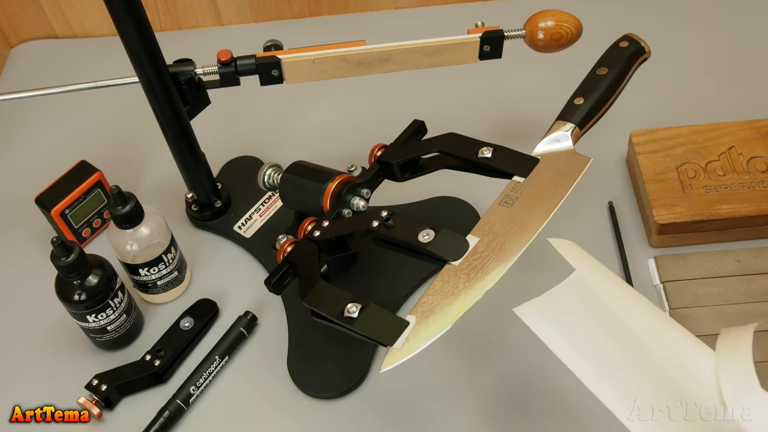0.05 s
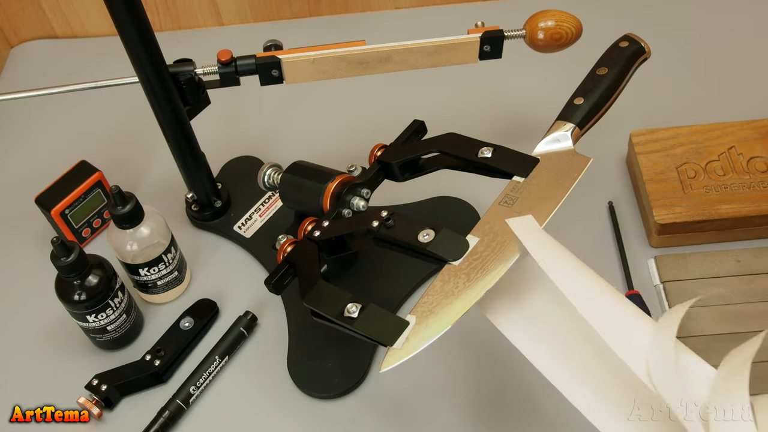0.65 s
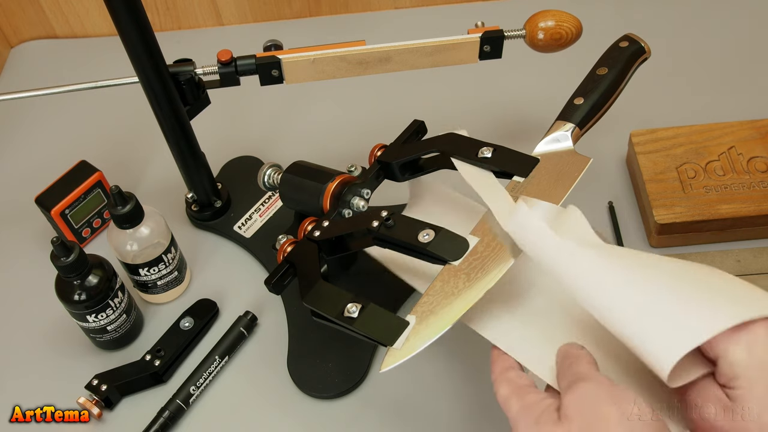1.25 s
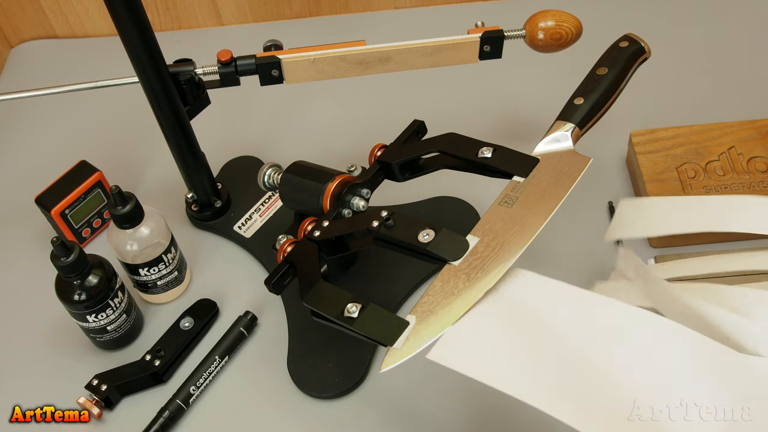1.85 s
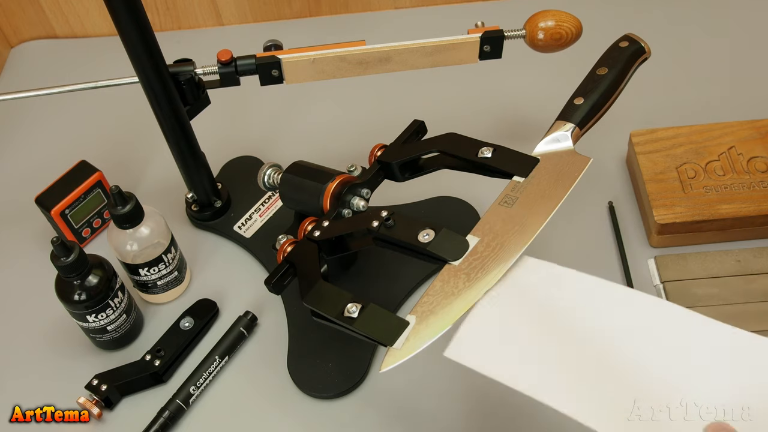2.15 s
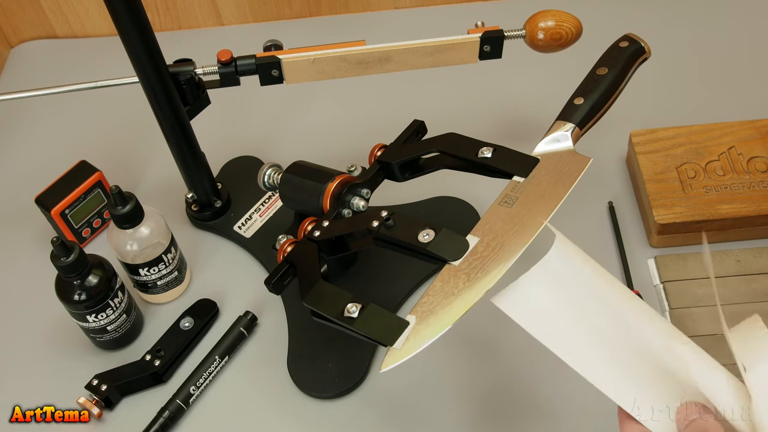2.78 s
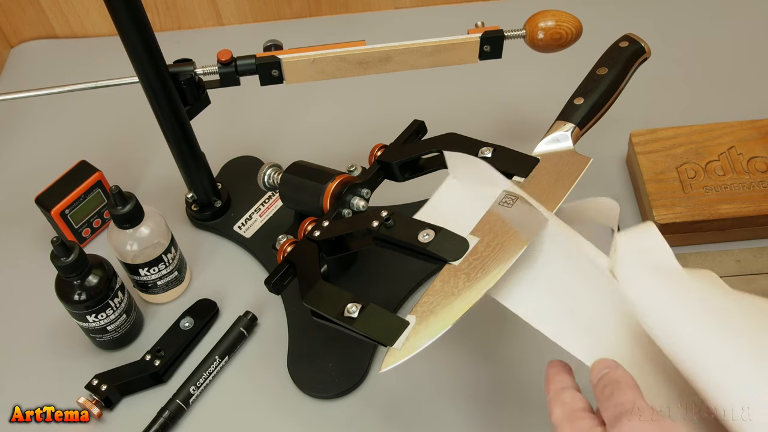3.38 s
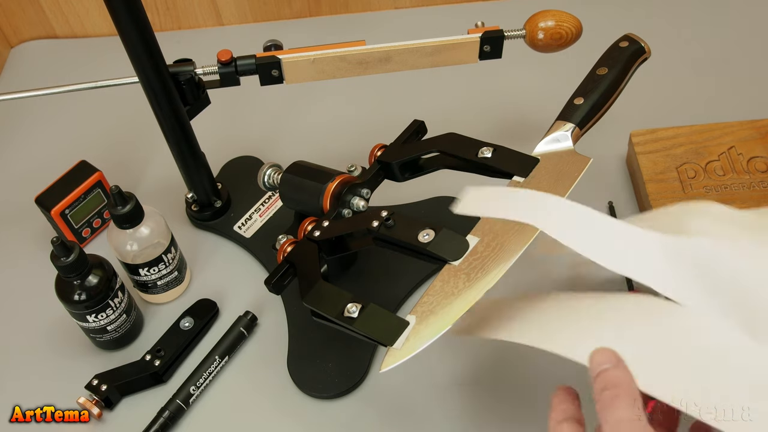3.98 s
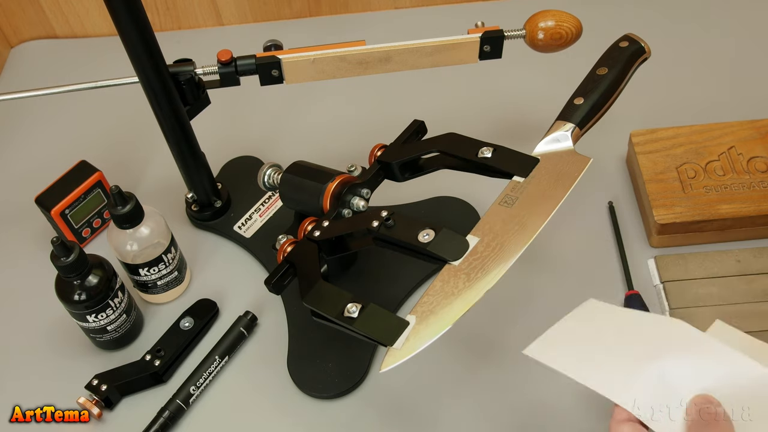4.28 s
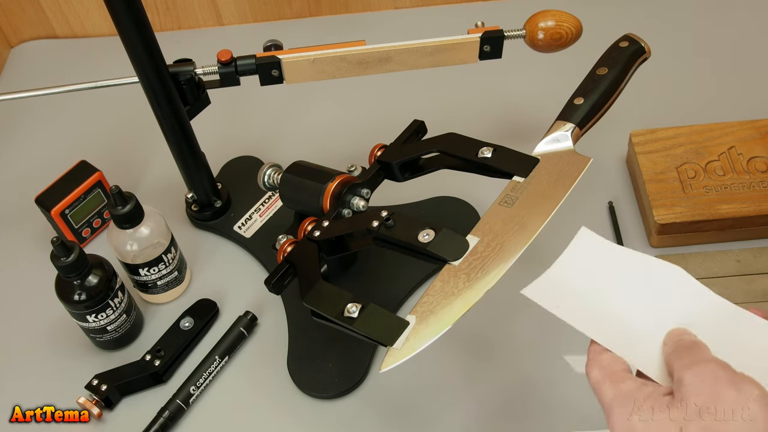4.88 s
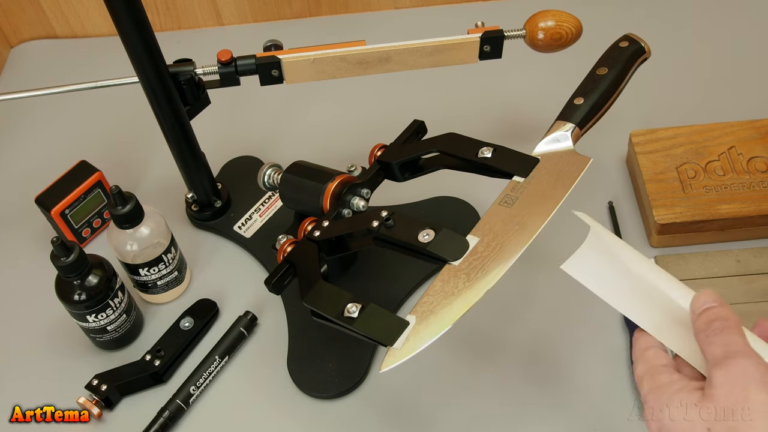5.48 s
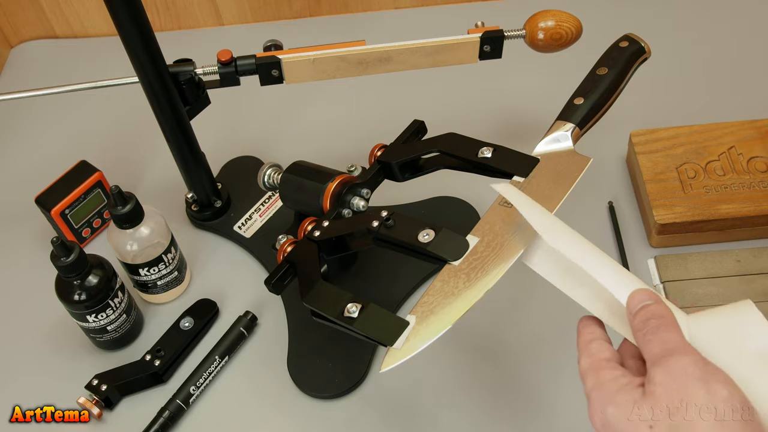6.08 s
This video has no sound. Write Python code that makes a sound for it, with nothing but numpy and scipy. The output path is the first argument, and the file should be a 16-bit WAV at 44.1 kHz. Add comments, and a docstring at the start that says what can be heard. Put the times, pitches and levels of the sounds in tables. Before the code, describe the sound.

A sharp knife slices through a paper sheet twice with a hissing rasp, and the paper rustles and crinkles between cuts.

```python
"""Paper drawn through a knife

A sheet is drawn through a sharp, clamped knife in a small workroom: two long slices, then a third begins.
The edge snaps thousands of fibres a second and the sheet radiates them as a hissing rasp, while the
loosening strip sings and flutters. Between slices the sheet is pulled back and regripped: it rustles,
ticks, buckles and flaps. Still air and a faint mains hum lie underneath."""
import sys
import numpy as np
from scipy import signal
from scipy.fft import rfft, irfft, next_fast_len
from scipy.io import wavfile
from scipy.ndimage import uniform_filter1d, map_coordinates

SR = 44100
rng = np.random.default_rng(int(sys.argv[2]) if len(sys.argv) > 2 else 0)


def inscribe(sig):
    """Save sig as 16-bit PCM at rate SR to the path in sys.argv[1].

    A 1-D sig is mono; a 2-D sig holds one channel per row.
    Samples are clipped to [-1, 1] before scaling.
    """
    pcm = np.round(np.clip(np.atleast_2d(sig).T, -1, 1) * 32767)
    wavfile.write(sys.argv[1], SR, pcm.astype(np.int16))


N = 270774
TIME = np.arange(N) / SR
FFT_SIZE = next_fast_len(N + SR // 2, True)
FREQS = np.maximum(np.arange(FFT_SIZE // 2 + 1) * SR / FFT_SIZE, 1)

# how hard the sheet is drawn through the edge, one curve per slice: (time [s], level [dB])
EFFORT = [
    [(0.65, -51), (0.68, -36), (0.836, -27.5), (1.298, -26), (1.306, -27.5), (1.418, -26), (1.43, -20.5),
     (1.6, -34), (1.612, -30.5), (1.64, -50)],
    [(3.17, -50), (3.18, -40), (3.202, -32), (3.334, -25), (3.7, -31), (3.762, -27), (3.886, -32),
     (3.93, -51)],
    [(6.06, -46.5), (6.086, -33.5), (6.135, -31)],
]
# each slice at the usual effort: (fibre hiss [dB], loose flutter [dB], time to come loose [s])
SLICES = [(-36.5, -50, 0.035), (-35, -47, .32), (-29.5, -52, 0.11)]
# resonances of strip and sheet, per slice: (pitch [Hz], level re effort [dB], delay into the slice [s])
STRIP_MODES = [
    [(2045, -8, 0.048), (4930, -11.5, 0), (4220, -14, 0.14), (3200, -8, 0.19), (2400, -10.5, 0.28)],
    [(3650, -5.5, 0.0014), (5120, -11.5, 0.0044), (2900, -6.5, .04), (2630, -6, 0.089), (4140, -9, .05),
     (3080, -7, 0.12)],
    [(2960, -1.5, 0), (283, -17.5, 0)],
]
# paper slides in the fingers: (start [s], end [s], rustle [dB], hiss [dB], sway [dB])
SLIDES = [(-0.03, .28, -64, -69.5, -70.5), (1.632, 1.828, -42.5, -46, -53.5),
          (1.835, 2.12, -54.5, -59, -55.5), (2.21, 2.335, -58.5, -70, -59.5), (2.329, 2.449, -46, -56, -53),
          (2.51, 2.717, -61.5, -65, -68), (2.964, 3.093, -61, -64.5, -81), (3.894, 4.057, -54, -54, -63),
          (4.142, 4.278, -56, -62.5, -58), (4.312, 4.46, -56, -86, -55), (4.467, 4.704, -58, -59.5, -62),
          (4.702, 5.357, -64.5, -65.5, -69.5), (5.39, 5.705, -65, -68, -76),
          (5.817, 5.846, -62, -64.5, -80), (5.944, 6.07, -56.5, -62, -64)]
# the broad sheet flaps: (time [s], level [dB], centre [Hz], t60 [s])
FLAPS = [(1.415, -39.5, 460, 0.19), (1.938, -48, 383, 0.059), (2.321, -51, 220, .12),
         (2.398, -43.5, 383, 0.23), (3.72, -46, 295, 0.48), (3.8, -46.5, 328, 0.37),
         (4.615, -53.5, 587, 0.087)]

# one-shots: (time [s], body level [dB], centre [Hz], treble re body [dB], t60 [s])
CATCHES = [(1.428, -30, 1780, -8, 0.11), (1.451, -29, 1560, 3.5, 0.057), (1.475, -30.5, 1900, 4, 0.035),
           (1.607, -35, 1680, -34, 0.08)]  # the edge catches and rips through a clump of fibres
TICKS = [(0.116, -50, 1950, -14, 0.075), (0.241, -50.5, 2080, -23, 0.11), (1.673, -30, 3200, -4.5, 0.048),
         (1.753, -27.5, 2910, -25, 0.031), (1.782, -37, 3820, -3, 0.047), (1.82, -48, 3450, -6, .06),
         (1.946, -41, 3300, -11, 0.033), (2.086, -34, 3060, -2, 0.027), (2.177, -44, 3450, -17, 0.073),
         (2.842, -56.5, 5100, -14, 0.071), (2.89, -55.5, 2880, -9.5, 0.11), (3.954, -42.5, 2230, -4, 0.049),
         (4.144, -53.5, 1500, -3.5, 0.29), (4.508, -44.5, 3150, -7, 0.03), (4.929, -48, 3970, 0.5, .06),
         (5.454, -57, 2030, -11, .08), (5.075, -52, 3600, -13, 0.11)]  # creases tick and the cut strip flicks
SWISHES = [(1.89, -41, 3140, -3.5, 0.13), (2.024, -42, 1920, -6.5, 0.092), (2.052, -39.5, 3300, -5.5, 0.17),
           (2.113, -50, 3240, 3, 0.2), (2.33, -50, 2900, -9, 0.087), (2.364, -40, 3200, -9, 0.08),
           (2.438, -43, 1910, -3.5, 0.062), (4.215, -43.5, 2440, -24, 0.12), (5.175, -61, 3460, 8.5, 0.22),
           (5.205, -49, 3190, -3.5, 0.18), (5.545, -46, 2520, -6, .1), (5.565, -49.5, 2570, -9, 0.16)]  # the sheet swings
BUCKLES = [(2.244, -40, 3020, -33, 0.052), (2.356, -32, 3050, -1.5, 0.051), (2.405, -28, 3070, -11, 0.058),
           (2.411, -27, 2400, -16, 0.082), (4.168, -29.5, 1600, -16, 0.074),
           (4.29, -49.5, 1570, -30, 0.063), (4.346, -45, 3020, -8, 0.071), (4.37, -47, 2900, -17, 0.19),
           (4.407, -40.5, 1690, -43, 0.12), (4.444, -40, 2270, -36, 0.08), (4.622, -59, 2920, -18, 0.11),
           (5.008, -50, 1560, -13, 0.024), (5.293, -39.5, 3300, -34, 0.044)]  # the whole sheet buckles over
TAPS = [(5.975, -24.5, 3920, -7.5, 0.038)]  # the sheet's rim is set on the blade

# tone colours: (frequency [Hz], relative level [dB])
CUT_COLOUR = [(500, -32.5), (900, -33.5), (1150, -27), (1400, -11), (1650, -6.5), (2100, -0.5), (3100, 2.5),
              (4200, -2.5), (5500, -4.5), (7500, -9.5), (10000, -12), (14500, -17), (16000, -24)]
FLUTTER_COLOUR = [(25, -10), (60, -7), (130, -5.5), (250, -4.5), (400, -2.5), (540, 0.5), (650, -2),
                  (790, 2), (950, -5), (1200, -6.5), (1800, -66)]
RUSTLE_COLOUR = [(500, -46), (900, -7.5), (1120, -14), (1450, -3), (2040, 4.5), (2400, 3), (3400, 4.5),
                 (4500, 0.5), (6400, -9), (8000, -15.5), (12000, -20), (16000, -18)]
SWAY_COLOUR = [(40, -13.5), (130, -4), (250, 0), (400, 5), (540, 1.5), (650, -2), (790, 2), (950, -6),
               (1200, -27.5), (1800, -26.5)]
TICK_COLOUR = [(100, -9), (400, -36), (800, -5.5), (1100, -22), (1900, -0.5), (3500, 0), (7000, -6),
               (11000, -20.5), (16000, -24)]
BUCKLE_COLOUR = [(60, -8), (200, -25), (390, 0.5), (520, -2.5), (640, -3), (830, 1), (1100, -11), (1600, 3),
                 (3000, 3.5), (6600, -5.5), (8500, -25.5), (16000, -37)]
ROOM_COLOUR = [(15, -45), (25, -11.5), (117, 2.5), (212, 3), (451, -5), (591, -8), (800, -15), (1150, -24),
               (2000, -12), (2690, -12), (3430, -11.5), (4740, -18), (14000, -29.5), (16000, -49)]

# how alike the two microphone ports sound: (frequency [Hz], left-right correlation [-1 to 1])
LIKENESS = [(30, 0.2), (120, 0.6), (400, .8), (1500, 0.72), (3200, 0.79), (4500, 0.16), (6200, 0),
            (9000, -0.41), (12000, 0), (16000, 1)]
# their lean to the left: (frequency [Hz], left minus right [dB])
BALANCE = [(60, 3.1), (130, 2.3), (290, 1.9), (640, 2.3), (1410, 3.1), (3100, 0.85), (6820, 3.4),
           (15000, 1.4)]

USUAL_EFFORT_DB, RASP_DB = -28, -2  # the rasp is relative to the effort
HISS_FOLLOWS, FLUTTER_FOLLOWS = 0.92, 0.51  # shares of the effort's swing in dB
TAUT_FLUTTER_DB = -15  # a taut strip flutters less
HISS_EDGE_HZ = 5500  # crossover from ringing body to fibre hiss


def slicing():
    """The edge snaps fibres densely; the sheet rings, and flutters more as the strip comes loose."""
    fibres = grains(per_s=6000, spread_db=2, clump_db=1, clump_rate=45)
    voice = sheet(fibres, ring_t60=.05, ring_db=-8, wander_db=9, places=8)
    rasp, hiss = rasp_and_hiss(bending(voice, depth_db=2.5, hold_frames=14), CUT_COLOUR)
    jerks = flutter(grains(per_s=830, spread_db=1, clump_db=1.5, clump_rate=120), FLUTTER_COLOUR)
    ringing = from_db(RASP_DB) * rasp + singing_strip()
    out = np.zeros((2, N))
    for curve, (hiss_db, flutter_db, loosen_s) in zip(EFFORT, SLICES):
        times, levels_db = np.transpose(curve)
        start, end = times[0], times[-1]
        span = slice(*np.searchsorted(TIME, [start - .02, end + .02]))
        t = TIME[span]
        gate = uniform_filter1d(1. * ((t >= start) & (t <= end + .008)), size=300)
        effort_db = np.interp(t, times, levels_db)
        swing_db = effort_db - USUAL_EFFORT_DB
        taut = np.clip(1 - (t - start) / loosen_s, 0, 1)
        cut = from_db(effort_db) * ringing[:, span]
        cut += from_db(hiss_db + HISS_FOLLOWS * swing_db) * hiss[:, span]
        cut += from_db(flutter_db + FLUTTER_FOLLOWS * swing_db + TAUT_FLUTTER_DB * taut) * jerks[:, span]
        out[:, span] += gate * cut
    return out


def singing_strip():
    """The taut strip rings at one pitch after another, then glides down as it lengthens."""
    out = np.zeros((2, N))
    for curve, modes in zip(EFFORT, STRIP_MODES):
        for hz, db, delay_s in modes:
            add_note(out, curve[0][0] + delay_s, hz, hz, db, length_s=.35)
    for curve in EFFORT[:2]:  # one broad glide near the middle of each full slice
        start, end = curve[0][0], curve[-1][0]
        glide_start = start + .45 * (end - start)
        add_note(out, glide_start, from_hz=4694, to_hz=3150, db=-7, length_s=.33, width_hz=550)
    for hz, db in (2610, -1), (3130, -1.4):  # the edge squeaks once, on two tones
        add_note(out, 1.295, hz, hz, db, length_s=.063)
    return out


def add_note(out, start, from_hz, to_hz, db, length_s, width_hz=107):
    """Random fibre snaps keep a narrow resonance ringing while it swells and fades."""
    white = rng.standard_normal((2, 2, SR // 2))
    ringing = signal.sosfilt(signal.butter(2, width_hz / 2, fs=SR, output="sos"), white[0] + 1j * white[1])
    first = round(start * SR)
    progress = np.clip((TIME[first:first + ringing.shape[1]] - start) / length_s, 0, 1)
    phase = 2 * np.pi * np.cumsum(from_hz + (to_hz - from_hz) * progress) / SR
    note = rms_one((ringing[:, :len(phase)] * np.exp(1j * phase)).real)
    swell = np.sqrt(np.abs(np.sin(np.pi * progress)))
    out[:, first:first + len(phase)] += from_db(db) * note * swell


def grains(per_s, spread_db, clump_db, clump_rate):
    """Tiny snaps of uneven size that come in clumps."""
    sizes = from_db(spread_db * np.minimum(rng.exponential(1, N), 4)) * rng.choice([-1, 1], N)
    fires = rng.random(N) < per_s / SR
    return sizes * fires * from_db(clump_db * drift(clump_rate))


def sheet(snaps, ring_t60, ring_db, wander_db, places=6, crack_t60=.006):
    """Each place on the sheet has its own crack and ring; the active place wanders. Gives mid and side."""
    t = TIME[:SR // 12]
    odds = from_db(wander_db * np.array([drift(2.5) for _ in range(places)]))
    thresholds = np.cumsum(odds / odds.sum(0), axis=0)
    place = (rng.random(N) > thresholds).sum(0)
    decay = from_db(-60 * t / crack_t60) + from_db(ring_db - 60 * t / ring_t60)
    answers = rng.standard_normal((places, 2, len(t))) * decay
    out = sum(signal.oaconvolve((snaps * (place == k))[None], answers[k], axes=1)[:, :N]
              for k in range(places))
    return out / np.std(out, axis=1, keepdims=True)


def bending(x, depth_db, hold_frames):
    """As the sheet bends, narrow resonances come and go at random and slide in pitch."""
    framing = dict(nperseg=1024, noverlap=768)
    spectra = signal.stft(x.astype(np.float32), **framing)[2]
    bins, frames = np.indices(spectra.shape[1:])
    peaks = uniform_filter1d(rng.standard_normal(bins.shape), size=hold_frames, axis=1)
    peaks = uniform_filter1d(peaks, size=4, axis=0)  # four bins wide
    slide = 1 + .04 * np.sin(2 * np.pi * frames / 200)
    sliding_peaks = map_coordinates(peaks, [bins * slide, frames], order=1, mode="nearest")
    gain = from_db(depth_db * rms_one(sliding_peaks))
    return rms_one(signal.istft(spectra * gain, **framing)[1][:, :N])


def rasp_and_hiss(x, colour):
    """Split the paper's voice into its ringing middle and its fibre hiss."""
    spectrum = rfft(x, FFT_SIZE) * causal(at_hz(colour, FREQS), FFT_SIZE)
    steep = (FREQS / HISS_EDGE_HZ) ** 8
    return [rms_one(irfft(spectrum * share / (1 + steep), FFT_SIZE)[:, :N]) for share in (1, steep)]


def flutter(snaps, colour):
    """The broad sheet pumps air at every jerk."""
    return coloured(np.array([snaps, snaps * rng.choice([-1, 1], N)]), colour)


def rustling(attack_s=.047, release_t60=.25):
    """Fingers and strips slide over the sheet: fine crackle that swells, holds and dies with each move."""
    power = np.zeros((3, N))
    for start, end, *levels_db in SLIDES:
        span = slice(*np.searchsorted(TIME, [start, end + release_t60]))
        t = TIME[span]
        attack = np.minimum((t - start) / attack_s, 1)
        release = from_db(-60 * np.maximum(t - end, 0) / release_t60)
        power[:, span] += np.outer(from_db(levels_db), attack * release) ** 2
    crackle = grains(per_s=3000, spread_db=1, clump_db=2, clump_rate=81)
    voice = sheet(crackle, ring_t60=.023, ring_db=-6.5, wander_db=7)
    rustle, hiss = rasp_and_hiss(bending(voice, depth_db=3.5, hold_frames=7), RUSTLE_COLOUR)
    sway = flutter(grains(per_s=1200, spread_db=4, clump_db=2, clump_rate=2.6), SWAY_COLOUR)
    return sum(gain * layer for gain, layer in zip(np.sqrt(power), (rustle, hiss, sway)))


def pops(rows, colour, rise_share, focus_db, grit_db, patch_octaves=.35, size=12288):
    """Paper gives way in a dying avalanche, boosted round the pitch of the patch that moves."""
    out, t = np.zeros((2, N + size)), TIME[:size]
    hz = np.maximum(np.arange(size // 2 + 1) * SR / size, 1)
    steep = (hz / HISS_EDGE_HZ) ** 8
    for start_s, db, centre_hz, treble_db, t60_s in rows:
        focus = np.exp(-(np.log2(hz / centre_hz) / patch_octaves) ** 2)
        patch = from_db(at_hz(colour, hz) + focus_db * focus)
        body = rms_one(patch / (1 + steep))
        hiss = from_db(treble_db) * rms_one(patch * steep / (1 + steep))
        tone = causal(20 * np.log10(body + hiss), size)
        envelope = rise_and_fall(t, rise_share * t60_s, t60_s)  # longer pops start more softly
        # grit: the avalanche runs in slips of about a millisecond
        slips = rms_one(from_db(grit_db * np.repeat(rng.uniform(-1, 1, size // 48), 48)))
        burst = rfft(rng.standard_normal((2, size)) * slips * envelope)
        first = round(start_s * SR)
        out[:, first:first + size] += from_db(db) * irfft(burst * tone, size)
    return out[:, :N]


def flapping(rise_s=.023, top_hz=1020, band_ratio=1.3):
    """The broad sheet pushes a hollow puff of air each time it flaps."""
    out, t = np.zeros((2, N + SR // 2)), TIME[:SR // 2]
    lowpass = signal.butter(2, top_hz, fs=SR, output="sos")
    for start_s, db, hz, t60_s in FLAPS:
        air = rng.standard_normal((2, len(t)))
        band = signal.butter(1, [hz / band_ratio, hz * band_ratio], "band", fs=SR, output="sos")
        puff = rms_one(signal.sosfilt(lowpass, signal.sosfilt(band, air)))
        first = round(start_s * SR)
        out[:, first:first + len(t)] += from_db(db) * rise_and_fall(t, rise_s, t60_s) * puff
    return out[:, :N]


def room(x, t60_s=.16, wet_db=-10, predelay_s=.004):
    """The bench and the walls add a short diffuse tail."""
    t = TIME[:SR // 2]
    tail = rng.standard_normal((2, len(t))) * from_db(-60 * t / t60_s) * (t > predelay_s)
    tail /= np.sqrt(np.sum(tail ** 2, axis=1, keepdims=True))
    return x + from_db(wet_db) * signal.fftconvolve(x, tail, axes=1)[:, :N]


def room_tone(air_db=-64, hum_db=-73.5, hum_hz=120):
    """Still air, with a faint, wavering mains hum in the mid channel."""
    air = from_db(air_db) * coloured(rng.standard_normal((2, N)), ROOM_COLOUR)
    air[0] += from_db(hum_db + 2 * drift(3)) * np.sqrt(2) * np.sin(2 * np.pi * hum_hz * TIME)
    return air


def microphone_ports(x, left_lag_s=.00002):
    """Mid and side become left and right: narrow in the midrange, wide in most of the treble."""
    mid, side = rfft(x, FFT_SIZE)
    alike = np.clip(at_hz(LIKENESS, FREQS), -.8, .98)
    sign = np.array([[1], [-1]])
    pair = mid + sign * side * np.sqrt((1 - alike) / (1 + alike))
    pair[0] *= np.exp(-2j * np.pi * FREQS * left_lag_s)
    return irfft(pair * from_db(sign * at_hz(BALANCE, FREQS) / 2), FFT_SIZE)[:, :N]


def rise_and_fall(t, rise_s, t60_s):
    """Linear attack, exponential decay."""
    return np.minimum(t / rise_s, 1) * from_db(-60 * np.maximum(t - rise_s, 0) / t60_s)


def drift(rate_hz):
    """Smooth random modulation of unit power."""
    pole = np.exp(-40 * np.pi * rate_hz / SR)  # runs at a twentieth of the sample rate
    slow = signal.lfilter([1], [1, -2 * pole, pole * pole], rng.standard_normal(N // 20 + 4002))[4000:]
    return np.interp(np.arange(N) / 20, np.arange(len(slow)), rms_one(slow))


def coloured(x, colour):
    """Give a steady signal a tone colour, at unit power."""
    spectrum = rfft(x, FFT_SIZE) * causal(at_hz(colour, FREQS), FFT_SIZE)
    return rms_one(irfft(spectrum, FFT_SIZE)[..., :N])


def causal(gain_db, size):
    """Minimum-phase response of a dB curve: nothing sounds before its cause."""
    cepstrum = irfft(np.log(from_db(gain_db)), size)
    cepstrum[1:size // 2] *= 2
    cepstrum[size // 2 + 1:] = 0
    return np.exp(rfft(cepstrum))


def at_hz(points, hz):
    """Read a table on a log-frequency axis."""
    table_hz, values = np.transpose(points)
    return np.interp(np.log(hz), np.log(table_hz), values)


def from_db(db):
    """Decibels to gain."""
    return np.exp(np.asarray(db) * (np.log(10) / 20))


def rms_one(x):
    """Scale to unit power."""
    return x / np.sqrt(np.mean(x ** 2) + 1e-20)


def scene():
    """Slices and paper handling in the workroom, over its room tone."""
    catches = pops(CATCHES, CUT_COLOUR, rise_share=.095, focus_db=12, grit_db=11.5)
    ticks = pops(TICKS, TICK_COLOUR, rise_share=.015, focus_db=11, grit_db=0)
    swishes = pops(SWISHES, RUSTLE_COLOUR, rise_share=.18, focus_db=6.5, grit_db=4.5)
    buckles = pops(BUCKLES, BUCKLE_COLOUR, rise_share=.063, focus_db=7, grit_db=-3.5)
    taps = pops(TAPS, TICK_COLOUR, rise_share=.087, focus_db=9.5, grit_db=1)
    paper = slicing() + rustling() + catches + ticks + swishes + buckles + taps + flapping()
    return microphone_ports(room(paper) + room_tone())


def record(dry):
    """A steep high cut at 15.9 kHz."""
    return signal.sosfilt(signal.ellip(12, .1, 90, 15900, fs=SR, output="sos"), dry)


dry = scene()
out = record(dry)
inscribe(out)
```